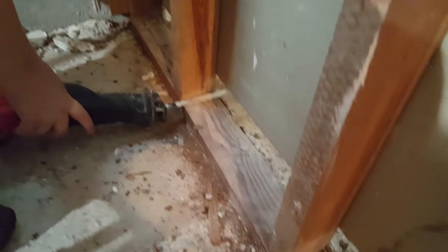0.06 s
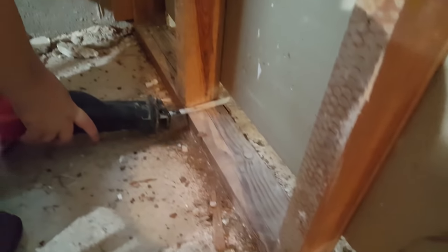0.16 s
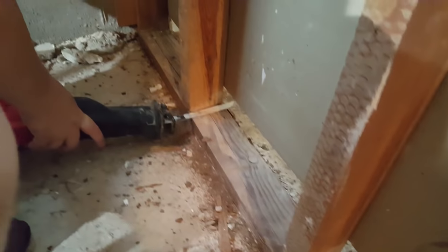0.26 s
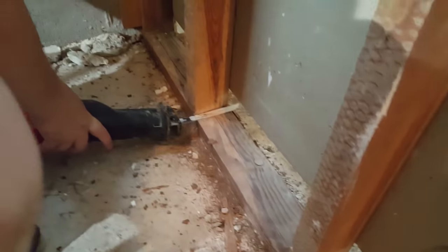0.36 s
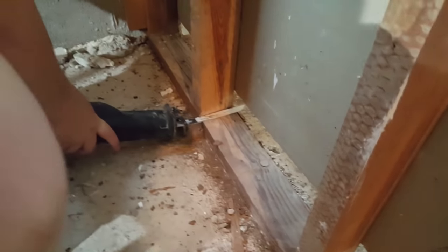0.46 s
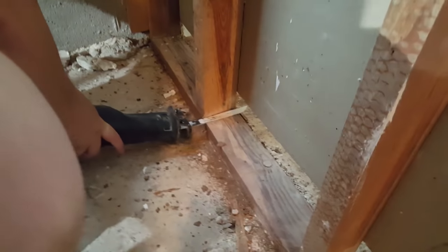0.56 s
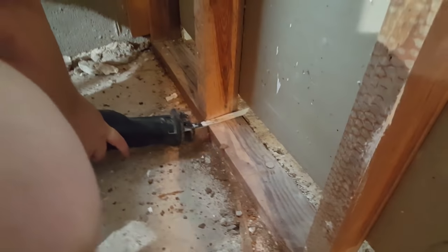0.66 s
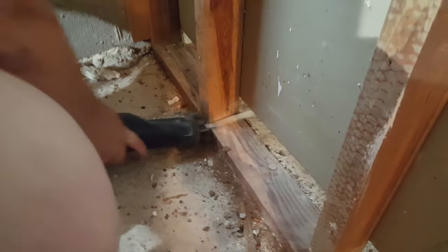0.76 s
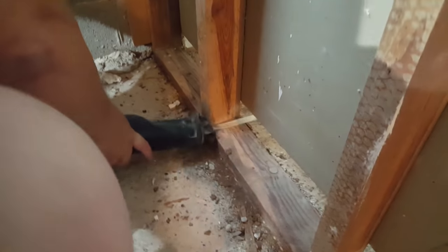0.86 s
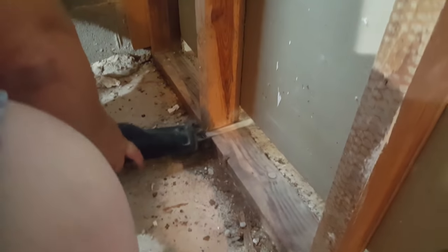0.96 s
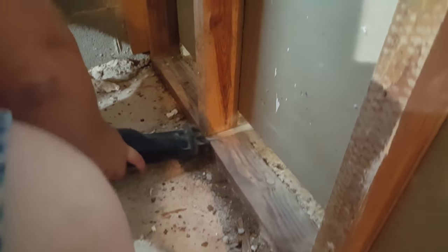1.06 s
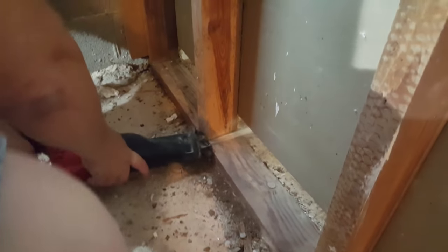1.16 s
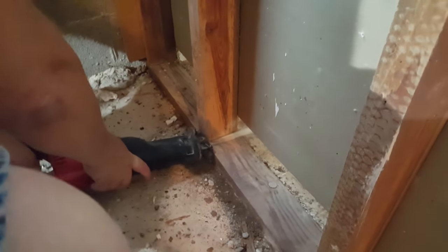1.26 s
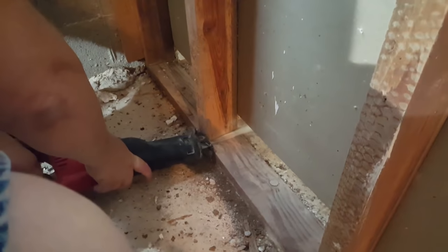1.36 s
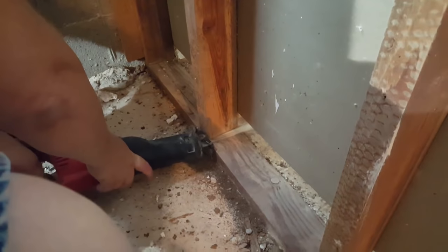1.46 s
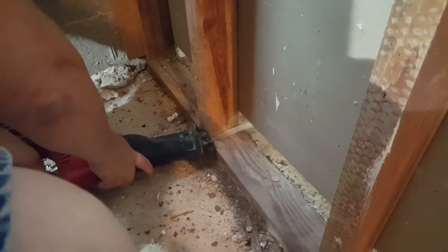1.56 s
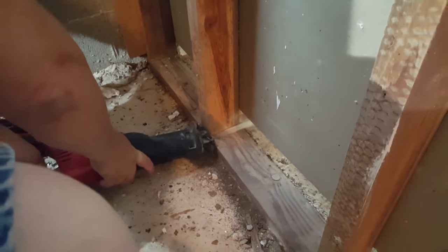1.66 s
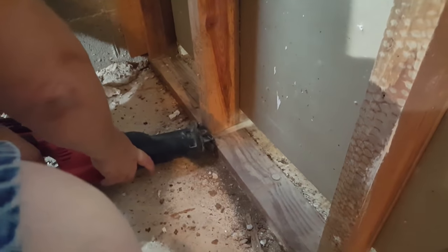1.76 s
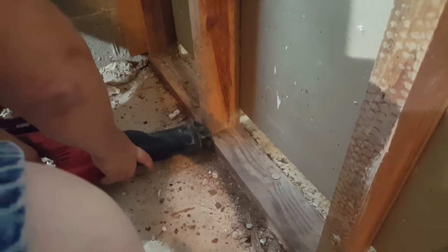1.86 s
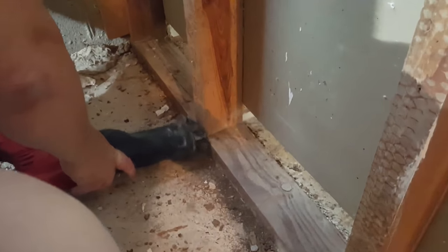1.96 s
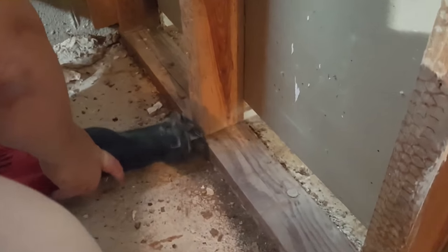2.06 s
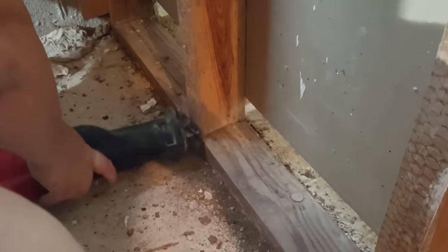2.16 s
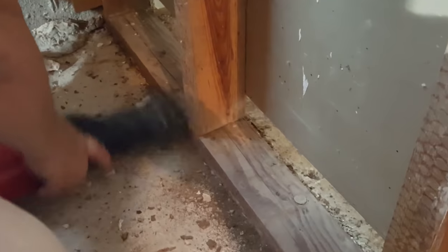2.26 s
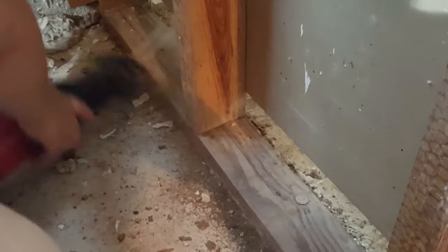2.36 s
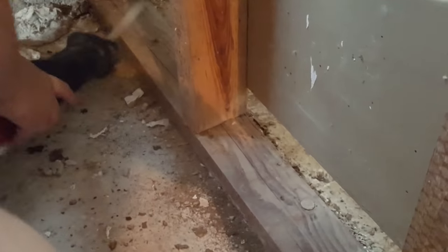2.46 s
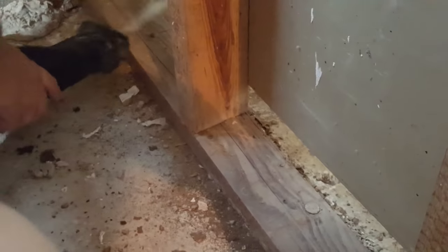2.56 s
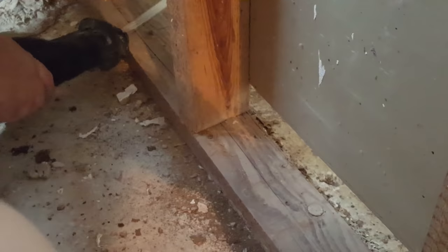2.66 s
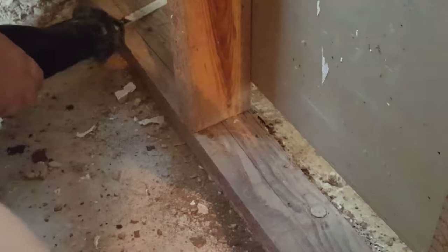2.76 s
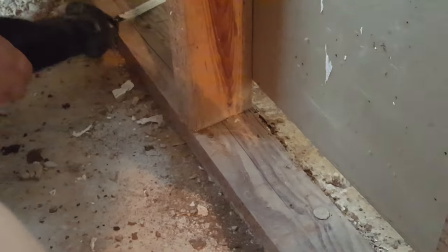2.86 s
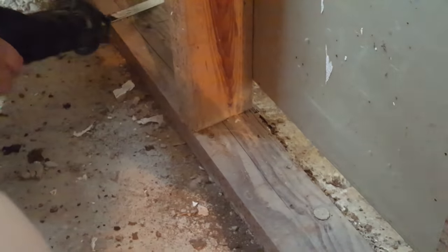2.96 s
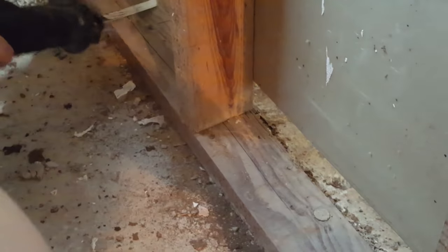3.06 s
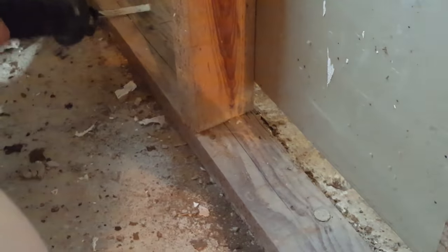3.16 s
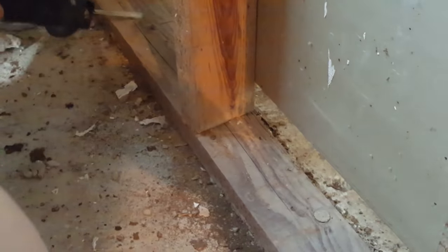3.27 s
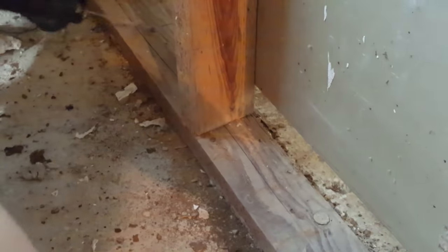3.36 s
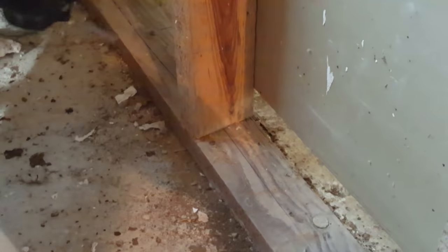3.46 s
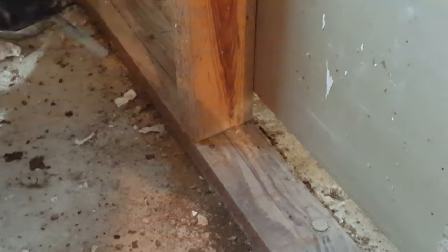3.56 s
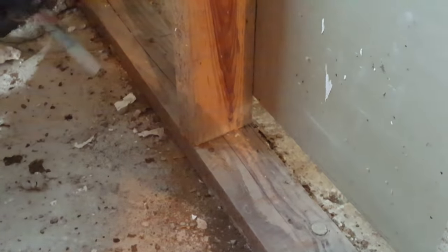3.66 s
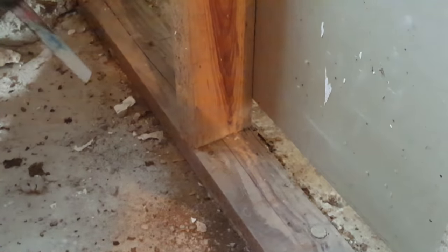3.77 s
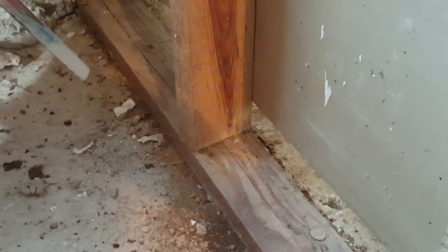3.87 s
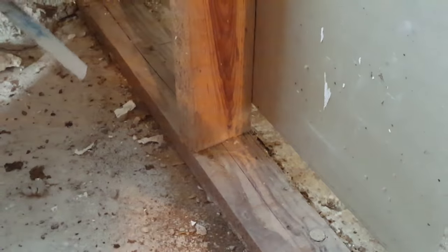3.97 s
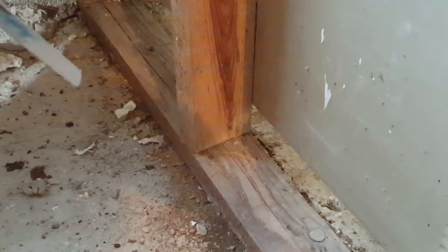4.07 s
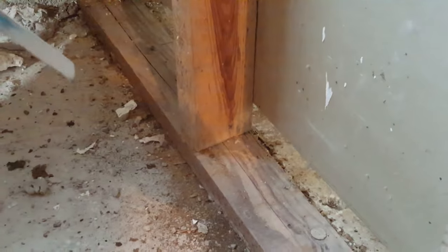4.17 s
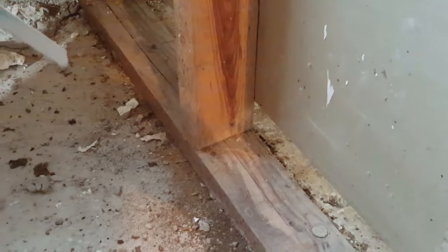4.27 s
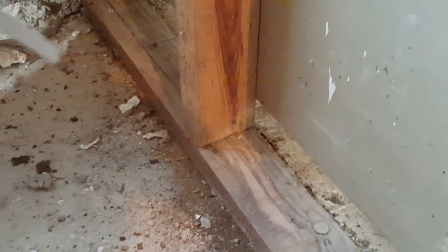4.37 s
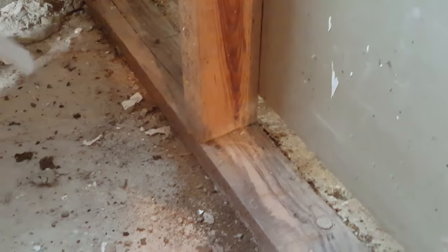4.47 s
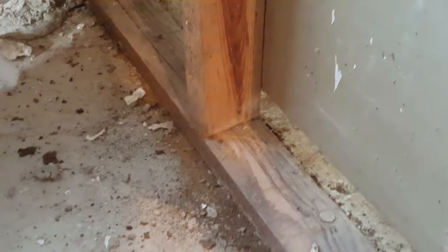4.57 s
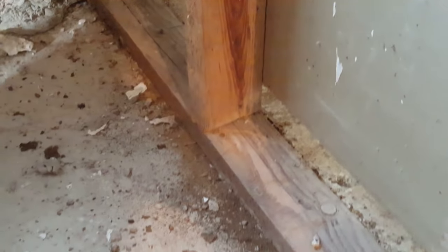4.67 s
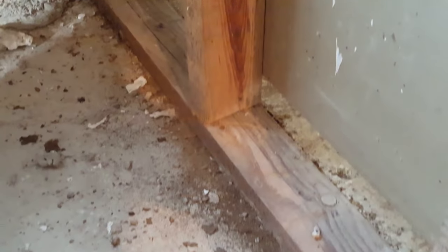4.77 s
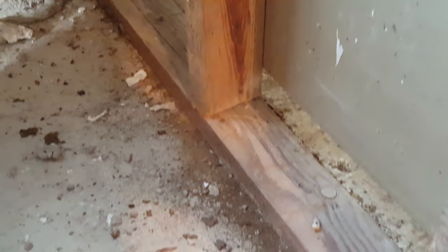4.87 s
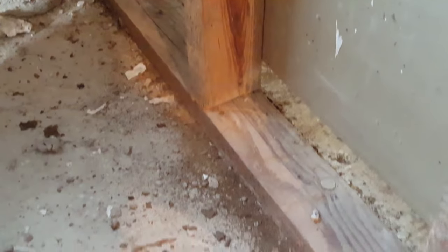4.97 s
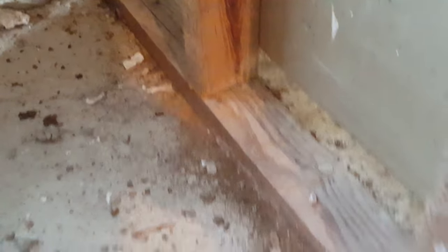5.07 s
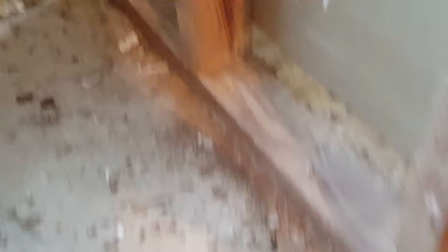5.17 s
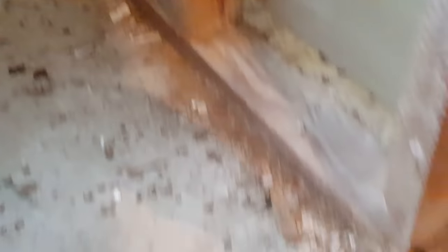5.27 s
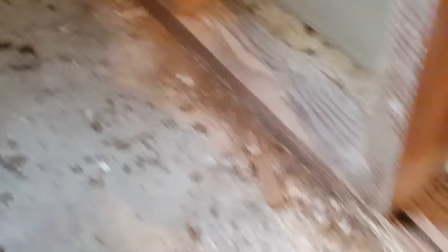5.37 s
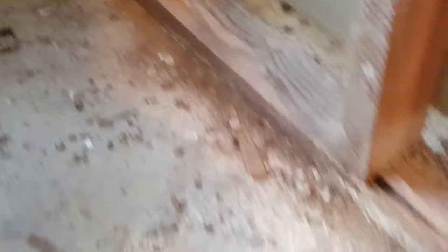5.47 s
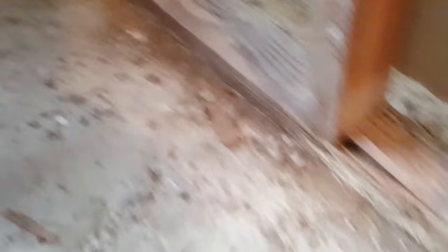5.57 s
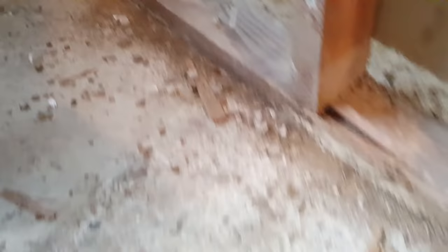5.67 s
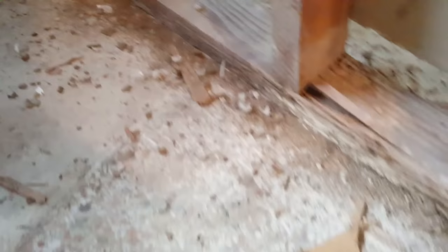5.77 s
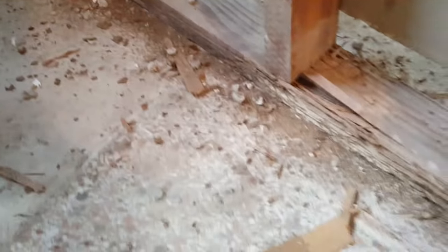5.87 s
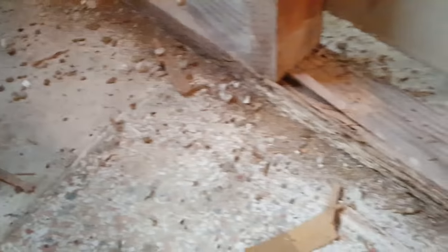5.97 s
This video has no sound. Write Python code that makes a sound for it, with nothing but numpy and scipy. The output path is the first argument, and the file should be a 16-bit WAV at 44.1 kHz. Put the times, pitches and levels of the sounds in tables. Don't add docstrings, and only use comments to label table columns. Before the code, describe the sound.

A power saw snarls through steel nails in a timber frame for two seconds, brakes dead, leaving low house rumble, debris ticks and scuffs.

```python
import sys
import numpy as np
from scipy import signal
from scipy.fft import rfft, irfft, next_fast_len
from scipy.io import wavfile
from scipy.ndimage import uniform_filter1d

SR = 44100
rng = np.random.default_rng(int(sys.argv[2]) if len(sys.argv) > 2 else 0)


def level_to_linear(level):
    exponent = np.asarray(level, float) / 20
    return 10 ** exponent


def wrap_up_sound(samples):
    columns = np.atleast_2d(samples).T
    tamed = np.clip(columns, -1, 1)
    steps = np.round(tamed * 32767).astype(np.int16)
    wavfile.write(sys.argv[1], SR, steps)


N = 265923
T_S = np.arange(N) / SR
BITE_S = 0.879

# time_s, strokes_per_s, beat_depth_db, grip (blade held in the cut, 0-1)
STROKES = [
    (0.85, 43, 3, 0),
    (0.95, 46.5, 4, .75),
    (1.03, 46.5, 4.4, 1),
    (2.18, 46.4, 2, 1),
    (2.3, 44.2, 2, .8),
    (2.4, 45, 2, .4),
    (2.48, 49.5, 1, .15),
    (2.75, 50.4, 1, .05),
]


def rms_one(x):
    return x / np.sqrt(np.mean(x ** 2) + 1e-20)


def in_time(rows, fade_s=0.014):
    s, *columns = np.transpose(rows)
    gate = np.clip(np.minimum(T_S - s[0], s[-1] - T_S) / fade_s + 1, 0, 1)
    return [np.interp(T_S, s, c) for c in columns] + [gate]


def colour(x, *spectra, fall_db=40):
    hz = np.maximum(np.arange(8193) * SR / 16384, 10)
    low_hz, high_hz = np.array(spectra[0])[[0, -1], 0]
    level_db = -fall_db * np.maximum(np.log2(np.maximum(low_hz / hz, hz / high_hz)), 0)
    for points in spectra:
        point_hz, point_db = np.transpose(points)
        level_db += np.interp(np.log(hz), np.log(point_hz), point_db)
    cepstrum = irfft(np.log(level_to_linear(level_db)))
    cepstrum[1:8192] *= 2
    cepstrum[8193:] = 0
    return signal.fftconvolve(x, irfft(np.exp(rfft(cepstrum))))[:N]


def spread(mid, side, spectrum):
    # hz, side_minus_mid_db
    side_curve = [(60, -17), (130, -24.5), (290, -8.5), (640, -7), (1410, -0.5), (3100, 0), (6820, -0.5),
                  (15000, -1.5)]
    shared = 0.21
    late_mid = signal.hilbert(mid, next_fast_len(N))[:N].imag
    side = shared * late_mid + np.sqrt(1 - shared ** 2) * side
    mid, side = colour(mid, spectrum), colour(side, spectrum, side_curve)
    return np.array([mid + side, mid - side]) / np.sqrt(np.mean(mid ** 2))


def drift(rate_hz):
    r = np.exp(-2 * np.pi * rate_hz / SR)
    wander = signal.lfilter([1], [1, -2 * r, r * r], rng.standard_normal(N + SR))
    return rms_one(wander[SR:])


def grains(per_s, spread_db, hiss):
    sizes = level_to_linear(spread_db * np.minimum(rng.exponential(1, (2, N)), 5))
    signs = rng.choice([-1, 1], (2, N))
    hits = rng.random((2, N)) < per_s / SR
    return rms_one(sizes * signs * hits) + hiss * rng.standard_normal((2, N))


def resonate(x, hz, width_hz):
    r = np.exp(-np.pi * width_hz / SR)
    return signal.lfilter([(1 - r * r) / 2, 0, (r * r - 1) / 2], [1, -2 * r * np.cos(2 * np.pi * hz / SR), r * r], x)


def part_levels_db():
    # time_s, level_db
    motor = [(0.76, -51), (0.81, -41), (0.835, -25.5), (0.86, -20.5), (1.0, -22), (2.2, -24.5),
             (2.69, -26.5), (2.73, -35.5), (2.77, -48), (2.86, -52), (3.1, -69)]
    # motor_share, free_db, held_db (added by grip), bite_db (added by first bite), steady_db (lost in steady cut)
    laws = ((1.77, -13, 14, 19, 7.5),
            (0.84, -3.5, 6.5, 17, 3.5),
            (0.64, -5, 9.5, 15.5, 1.5),
            (1.13, -2, 2.5, 6, 0.4))
    grip_powers = [.6, 1.9, 2, 3.5]
    mean_db = -24
    per_s, _, grip, _ = in_time(STROKES)
    motor_db, _ = in_time(motor)
    since_s = np.maximum(T_S - BITE_S, 0)
    bite = np.clip(since_s / 0.006, 0, 1) * np.exp(-since_s / 0.031)
    steady = np.exp(-((T_S - 1.58) / 0.43) ** 2 / 2)
    levels_db = []
    for (share, free_db, held_db, bite_db, steady_db), power in zip(laws, grip_powers):
        level_db = mean_db + share * (motor_db - mean_db) + free_db
        levels_db.append(level_db + held_db * grip ** power + bite_db * bite - steady_db * steady)
    levels_db[3] = levels_db[3] + 0.48 * (per_s - 46.5)
    running = in_time(motor)[-1]
    return levels_db, running


def stroke_beat():
    # start_s, lift_db
    jolts = [(0.960, 6), (1.008, 3), (1.030, 5), (1.071, 3), (1.092, 3), (1.113, 7), (1.157, 7), (1.179, 3),
             (1.29, 3), (1.653, 3), (1.804, 4), (1.917, 6), (1.972, 6), (2.018, 10), (2.061, 8), (2.104, 9),
             (2.147, 8), (2.193, 5), (2.24, 4), (2.295, 4), (2.355, 5), (2.438, 9), (2.454, 5)]
    per_s, depth_db, _, _ = in_time(STROKES)
    turns = np.cumsum(per_s) / SR - .66
    luck = rng.standard_normal(int(turns[-1]) + 2)[turns.astype(int)]
    beat_db = depth_db * (np.exp(-2.5 * (turns % 1)) * 2 - .8 + .25 * luck)
    for s, lift_db in jolts:
        beat_db += .7 * lift_db * (T_S > s) * np.exp(-np.maximum(T_S - s, 0) / 0.022)
    beat = level_to_linear(uniform_filter1d(beat_db, size=130))
    return beat / np.sqrt(uniform_filter1d(beat ** 2, size=6000))


def timber(beat):
    # hz, level_db_per_hz
    timber_curve = [(35, -27), (60, -7), (113, -1.5), (157, 1.5), (182, 1), (210, -5.5), (309, -2),
                    (458, -9), (550, -10.5), (600, -16), (780, -44), (1320, -120)]
    return spread(*(beat ** 0.28 * grains(900, 3.4, hiss=0.91)), timber_curve)


def stud_and_blade(beat, stud_db, blade_db):
    # hz, level_db_per_hz
    stud_curve = [(240, -22.5), (400, -1), (554, -2.5), (639, -6), (695, -0.5), (730, -3.5), (1300, -13),
                  (1690, -31.5), (2860, -120)]
    # hz, level_db_per_hz
    blade_curve = [(590, -19.5), (1000, 0.5), (1070, 1.5), (1260, -1), (1660, -2), (2740, -16),
                   (3200, -11.5), (4160, -47), (7040, -120)]
    # pitch_hz, width_hz, level_db
    modes = [(529, 57, -10), (632, 84, 4), (775, 104, -2), (930, 130, -1.5), (1228, 49, 0), (1405, 115, 2),
             (1620, 61, 3), (1814, 210, 2.5), (2080, 310, 2), (2260, 130, -3)]
    drive = beat * level_to_linear(1.6 * drift(90)) * grains(4000, 2.8, hiss=1)
    ringing = sum(level_to_linear(db + 4.2 * drift(25)) * resonate(drive, hz, width_hz) for hz, width_hz, db in modes)
    drive = drive + 1.8 * rms_one(ringing)
    blade_db = blade_db - 7 * np.clip((T_S - 2.74) / 0.045, 0, 1)
    stud = level_to_linear(stud_db - 2.5) * spread(*drive, stud_curve) * level_to_linear([[-.5], [.5]])
    blade = level_to_linear(blade_db) * spread(*drive, blade_curve) * level_to_linear([[.3], [-.3]])
    return (stud + blade) * np.clip((T_S - 0.8) / 0.042, .15, 1)


def teeth(beat):
    # hz, level_db_per_hz
    teeth_curve = [(1290, -6.5), (2200, -4), (2740, -8.5), (2910, -6.5), (4110, -3.5), (5380, -11),
                   (7920, -13), (8770, -16), (10200, -29), (12300, -21.5), (15200, -27), (16100, -14),
                   (16500, -56)]
    drive = beat ** 0.54 * level_to_linear(2.0 * drift(112)) * grains(9000, 2.9, hiss=0.96)
    return spread(*drive, teeth_curve) * level_to_linear([[-.3], [.3]])


def saw():
    (timber_db, stud_db, blade_db, teeth_db), running = part_levels_db()
    beat = stroke_beat()
    low = level_to_linear(timber_db + 1.5) * timber(beat)
    middle = stud_and_blade(beat, stud_db, blade_db)
    high = level_to_linear(teeth_db - 1.72) * teeth(beat)
    return running * (low + middle + high)


def shake():
    # multiple, rms_db, in_tune_s
    multiples = [(1, -29, 1.59), (2, -28, 1.66), (3, -29, 1.68), (4, -24, 1.66), (5, -24, 1.42),
                 (6, -27, 1.6), (7, -32, 1.5), (8, -28, 1.39), (9, -26, 1.66), (10, -25, 1.57),
                 (11, -28, 1.54), (13, -33, 1.56), (14, -24, 1.78), (14, -28, 2.03), (14, -29, 1.3),
                 (16, -31, 1.7), (16, -29, 2.12), (18, -33, 1.8), (19, -35, 1.7), (21, -33, 1.7),
                 (21, -30, 2.05), (25, -33, 1.67), (28, -33, 1.62)]
    per_s, _, grip, running = in_time(STROKES)
    turns = np.cumsum(per_s) / SR
    total = np.zeros(N)
    for k, db, at_s in multiples:
        lasts_s = 0.25 if k <= 4 else 0.11 if k <= 14 else 0.4
        swell = level_to_linear(db + 3 + drift(6)) * (.25 + np.exp(-((T_S - at_s) / lasts_s) ** 2 / 2))
        total += swell * np.sin(2 * np.pi * (k * turns + .75 * rng.random()))
    return running * grip * level_to_linear(-3.0) * total


def slaps():
    # start_s, peak_db, pitch_hz
    hits = [(0.939, -8, 1300), (0.96, 4, 711), (0.999, 1.5, 930), (1.031, 4.5, 1260), (1.071, 0, 1810),
            (1.092, -6, 1210), (1.114, 2, 1860), (1.135, -4, 1390), (1.158, -5, 910), (1.178, -9, 1010),
            (1.197, -12, 703), (1.217, -16, 1280), (1.266, -20, 1320), (1.292, -10, 1370),
            (1.333, -7, 1610), (1.354, -4, 842), (1.429, -2, 1610), (1.529, -8, 923), (1.583, -7, 1360),
            (1.636, -4, 748), (1.656, -2, 740), (1.67, 2.5, 990), (1.731, -1, 972), (1.799, -5, 929),
            (1.818, 0, 834), (1.842, 2, 1390), (1.917, -5, 1660), (1.926, 7, 1200), (1.935, -6, 1240),
            (1.954, 4, 1010), (1.971, 3.5, 800), (1.984, -6, 988), (2.004, -5, 1740), (2.019, -11, 1600),
            (2.031, -8, 980), (2.062, 4, 813), (2.074, -13, 746), (2.105, -16, 1240), (2.113, -7, 934),
            (2.123, -9, 1210), (2.136, -12, 1410), (2.149, -2, 720), (2.164, -2, 732), (2.196, 1.5, 1610),
            (2.243, -3, 1740), (2.293, -23, 1850), (2.321, -22, 940), (2.371, -11, 993), (2.438, 1.5, 806),
            (2.483, -9, 939)]
    dies_s, width_hz = 0.0089, 170
    out, t = np.zeros((2, N + 4000)), np.arange(4000) / SR
    for s, db, hz in hits:
        mid, side = rng.standard_normal((2, 4000))
        puff = (mid + 0.63 * side * [[1], [-1]]) * np.minimum(t / 0.0022, 1)
        upper = resonate(puff * np.exp(-t / dies_s * 5.4), hz * 1.12, width_hz * 1.04)
        part = upper + resonate(puff * np.exp(-t / dies_s), hz, width_hz)
        first = round(s * SR)
        out[:, first:first + 4000] += level_to_linear(db - 9.5) * part / np.abs(part).max()
    return out[:, :N] * level_to_linear([[.9], [-.9]])


def thump():
    since_s = np.maximum(T_S - BITE_S - .011, 0)
    hz = 158 + 230 * np.exp(-since_s / .016)
    swell = np.minimum(since_s / 0.0073, 1) * np.exp(-since_s / .06)
    return level_to_linear(-7) * swell * np.sin(2 * np.pi * np.cumsum(hz) / SR)


def whines():
    # start_s, end_s, pitch_hz, width_hz, level_db
    tones = [
        (0.72, 0.845, 7850, 20, -60),
        (0.825, 0.892, 6250, 500, -36),
        (0.858, 0.876, 1300, 50, -21),
        (2.6, 2.705, 1850, 200, -40),
    ]
    out = np.zeros((2, N))
    for start_s, end_s, hz, width_hz, db in tones:
        swell = np.clip((T_S - start_s) / (end_s - start_s) * 1.5, 0, 1) * np.clip((end_s - T_S) / .006, 0, 1)
        wander_hz = hz + width_hz / 2 * drift(width_hz / 2)
        out += level_to_linear(db + 9.5) * swell * np.sin(2 * np.pi * np.cumsum(wander_hz) / SR)
    return out


def ticks():
    # start_s, level_db (first 10 ms), centre_octaves (above 1 kHz), narrowness_db_per_octave2
    dry_ticks = [(0.746, -52, 3, 3), (2.438, -22, 2.2, 6), (2.885, -57, 1, 0.5), (3.096, -38, 1.4, 1),
                 (3.127, -48.5, 2.1, 7), (3.21, -52.5, 1.3, 6), (3.264, -28.5, 0.99, 3.5),
                 (3.393, -33, 2.65, 11), (3.404, -37.5, 2.5, 1), (3.549, -51.5, 1.5, 1.5),
                 (3.68, -57, 3.6, 4), (3.79, -35.5, 0.88, 5), (3.797, -36, 1.24, 18), (4.053, -37, .1, 15),
                 (4.083, -47, .3, 12), (4.106, -41, 0.6, 10), (4.151, -43, .1, 8), (4.75, -53, 4, 1.5),
                 (5.723, -49.5, 0.5, 1)]
    # start_s, level_db, centre_octaves, narrowness_db_per_octave2
    rattling_ticks = [(0.259, -61, 2, 3.5), (0.682, -31.5, -0.5, 0.73), (0.711, -49, 0.5, 1.5),
                      (0.788, -42.5, -0.8, 0.7), (3.319, -46.5, 2.5, 0.87), (3.34, -43.5, -0.1, 1.8),
                      (3.367, -52, 1, 4.5), (3.516, -41, 1.4, 6.9), (3.747, -40, 4, 1.8),
                      (3.917, -47, 1, 3.5), (3.944, -45, .5, 3.8), (4, -38, 0.4, 7.5), (4.024, -57, 2, .8),
                      (4.19, -47.5, 0.1, 5.7), (4.316, -55, 0.2, 1.3), (4.392, -43, -0.1, 4.2),
                      (5.04, -42, 1.8, 10), (5.055, -50, 0, 2), (5.823, -51, 1.5, 8),
                      (6.024, -41.5, 1.35, 10)]
    # pitch_hz, width_hz
    case_modes = [(915, 100), (1350, 120), (1890, 150), (2085, 150), (2740, 150), (3370, 160), (4190, 200),
                  (4650, 200), (5400, 250), (6300, 300)]
    edges_hz = np.array([280, 500, 900, 1600, 2400, 3400, 4800, 7000, 15000])
    bands = [signal.butter(3, pair, "band", fs=SR, output="sos") for pair in zip(edges_hz, edges_hz[1:])]
    octaves = np.log2(edges_hz[:-1] * edges_hz[1:] / 1e6) / 2
    quickness = 1.3 * level_to_linear(-2.2 * octaves)
    out, t = np.zeros((2, N + 8000)), np.arange(8000) / SR
    rows = [(*row, 0.054) for row in dry_ticks] + [(*row, 0.14) for row in rattling_ticks]
    for s, top_db, centre, narrow, t60_s in rows:
        mid, side = rng.standard_normal((2, 8000))
        puff = mid + 0.86 * side * [[1], [-1]]
        strengths_db = rng.normal(0, 3, len(case_modes))
        levels_db = top_db - 3.5 - narrow * (octaves - centre) ** 2
        start = round(s * SR)
        for band, db, quick in zip(bands, levels_db, quickness):
            crack = puff * (level_to_linear(-60 * t / .007) + .36 * level_to_linear(-60 * t / (t60_s * quick)))
            rung = sum(level_to_linear(lift_db) * resonate(crack, *mode) for mode, lift_db in zip(case_modes, strengths_db))
            part = signal.sosfilt(band, signal.lfilter([.5], [1, -.5], crack + .9 * rung))
            first_rms = np.sqrt(np.mean(part[:, :SR // 100].mean(axis=0) ** 2))
            out[:, start:start + 8000] += level_to_linear(db) * part / first_rms
    return out[:, :N]


def dragged_sole():
    # pitch_hz, width_hz, level_db
    board_modes = [(840, 90, 0), (1620, 70, -1), (2220, 120, 0), (2900, 120, -1), (3300, 100, -4),
                   (4070, 140, -1), (5300, 150, -3)]
    # hz, level_db_per_hz
    sole_curve = [(350, -13), (600, -20), (790, -5), (1430, -12), (1610, -4.5), (1850, -5), (4110, -8.5),
                  (8160, -12.5), (16000, -30)]
    attack_s, hold_s, release_s = 0.0098, 0.056, 0.027
    rasp = grains(5000, 2.5, hiss=1)
    ringing = sum(level_to_linear(db) * resonate(rasp, hz, width_hz) for hz, width_hz, db in board_modes)
    since_s = T_S - 5.893
    fading = np.exp(-np.maximum(since_s - attack_s - hold_s, 0) / release_s)
    swell = np.clip(since_s / attack_s, 0, 1) * np.maximum(fading, 0.28)
    return level_to_linear(-37.5) * swell * spread(*(rms_one(rasp) + .5 * rms_one(ringing)), sole_curve)


def scuffs():
    # peak_s, peak_db, fade_db_per_s (both sides)
    passes = [(3.1, -64, 21), (3.3, -53, 100), (3.51, -54, 83), (4.15, -54, 22), (5.07, -54.5, 160),
              (5.575, -52.5, 200), (5.61, -53.5, 150), (5.71, -53, 128)]
    # hz, level_db_per_hz
    grit_curve = [(350, -27), (600, -8), (803, 2.5), (1250, -2), (1630, -2), (1840, -1), (2150, -2.5),
                  (8130, -15), (14800, -31), (15800, -23), (16500, -61)]
    drive = level_to_linear(1.8 * drift(32)) * grains(2500, 3.5, hiss=1)
    swell = sum(level_to_linear(db - fade_db * np.abs(T_S - s)) for s, db, fade_db in passes)
    return spread(*drive, grit_curve) * swell


def house():
    # hz, level_db_per_hz
    house_curve = [(15, -54), (45, -24), (62, -1.5), (150, -1.5), (226, -10), (252, -14), (510, -27),
                   (553, -24), (766, -29.5), (831, -31.5), (2210, -33), (3230, -41.5), (7920, -51),
                   (15200, -101), (16500, -64)]
    duck_db = 10 * (T_S > 0.87) * np.exp(-np.maximum(T_S - 3.13, 0) / 0.31)
    hum = level_to_linear(-10.5) * rms_one(resonate(rng.standard_normal(N), 217.6, 7.3))
    rumble = spread(*(level_to_linear(0.35 * drift(30.0)) * rng.standard_normal((2, N))), house_curve)
    return level_to_linear(-29.5 - duck_db - 5.5) * (hum + rumble)


def room(x):
    t60_s, level_db, bass_t60_s, bass_db = 0.37, -12, 0.69, -2.5
    t = np.arange(SR // 2) / SR
    mid, side = rng.standard_normal((2, len(t))) * level_to_linear(-60 * t / t60_s) * (t > .004)
    side = signal.sosfilt(signal.butter(2, 600, "high", fs=SR, output="sos"), side)
    tail = signal.lfilter([.4], [1, -.6], [mid + side, mid - side])
    boom = signal.sosfilt(signal.butter(2, 900, fs=SR, output="sos"), rng.standard_normal(len(t)))
    tail += level_to_linear(bass_db) * boom * level_to_linear(-60 * t / bass_t60_s) * (t > .004)
    tail /= np.sqrt(np.mean(np.sum(tail ** 2, axis=1)))
    return x + level_to_linear(level_db) * signal.fftconvolve(x.mean(axis=0, keepdims=True), tail, axes=1)[:, :N]


def scene():
    in_room = saw() + slaps() + thump() + whines() + ticks()
    return room(in_room) + shake() + scuffs() + dragged_sole() + house()


def low_pass(x):
    return signal.sosfilt(signal.butter(12, 16950, fs=SR, output="sos"), x)


def record(dry):
    hissy = dry + level_to_linear(-72.5) * rng.standard_normal(dry.shape)
    rounded = 1.136 * np.tanh(hissy / 1.041)
    mix = signal.sosfilt(signal.cheby2(12, 60, 16500, fs=SR, output="sos"), rounded)
    return low_pass(mix)


dry = scene()
out = record(dry)
wrap_up_sound(out)
```